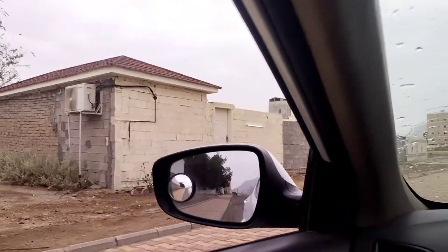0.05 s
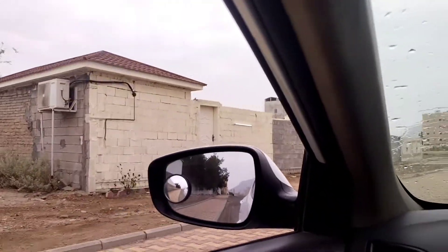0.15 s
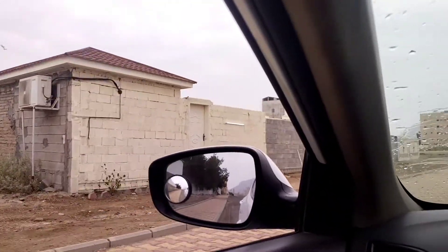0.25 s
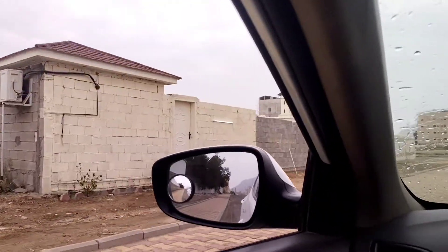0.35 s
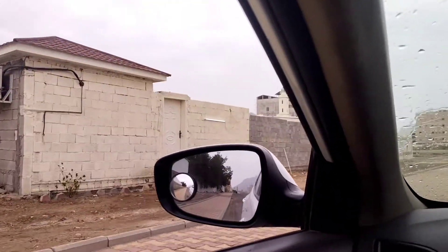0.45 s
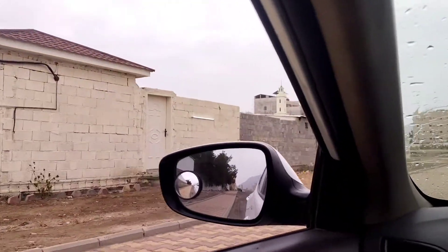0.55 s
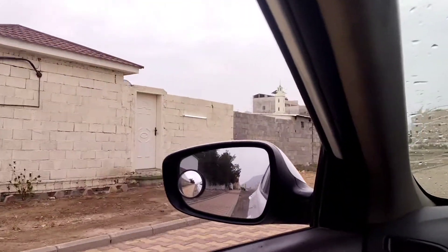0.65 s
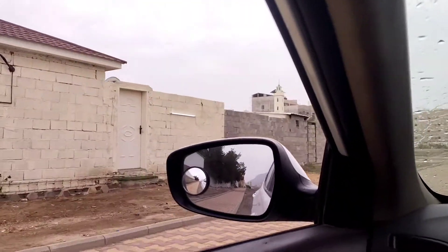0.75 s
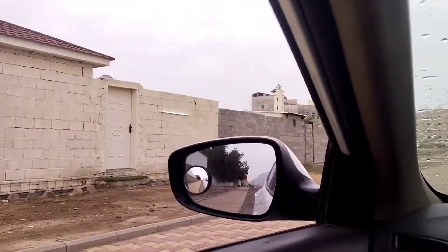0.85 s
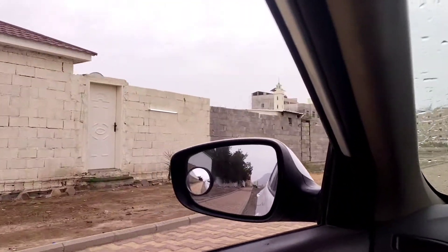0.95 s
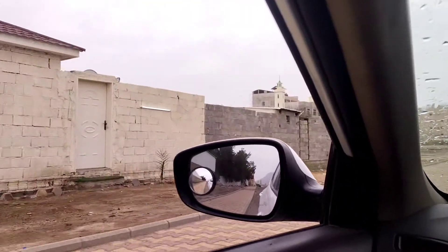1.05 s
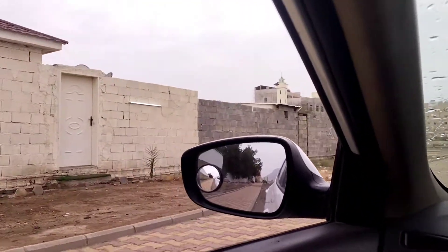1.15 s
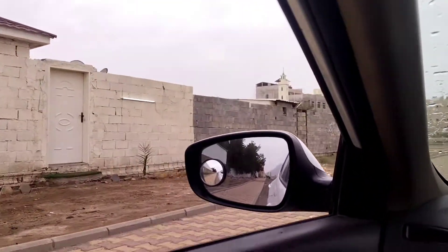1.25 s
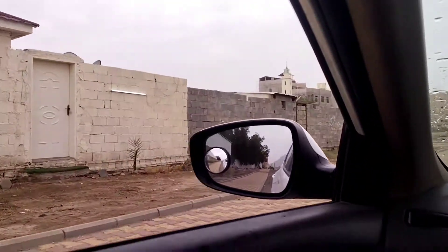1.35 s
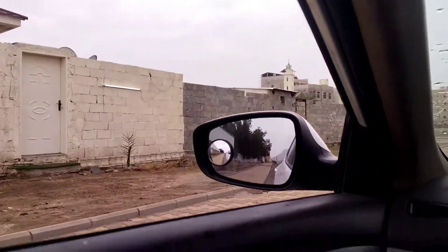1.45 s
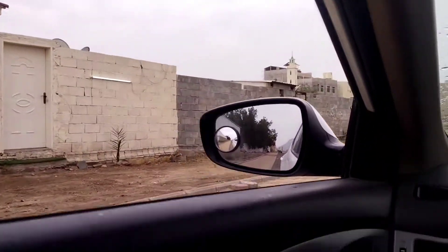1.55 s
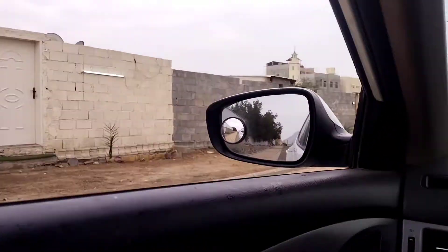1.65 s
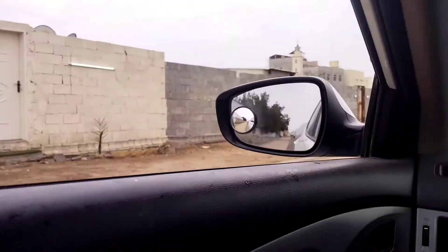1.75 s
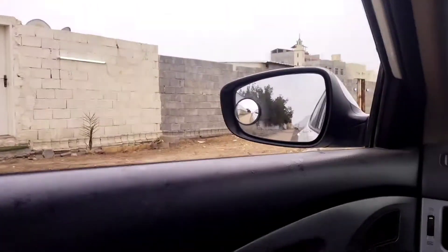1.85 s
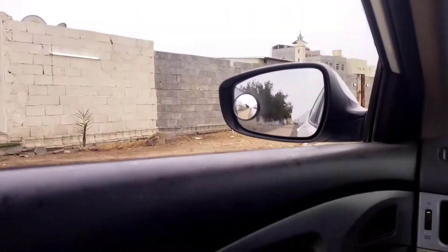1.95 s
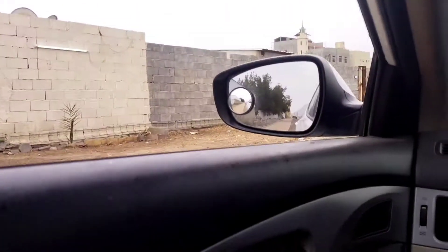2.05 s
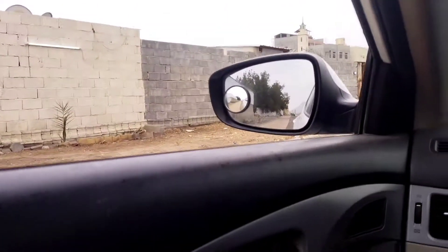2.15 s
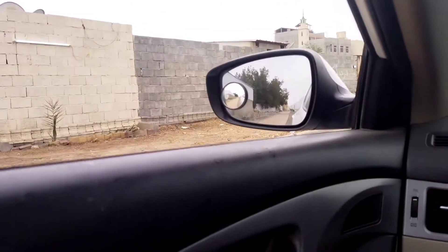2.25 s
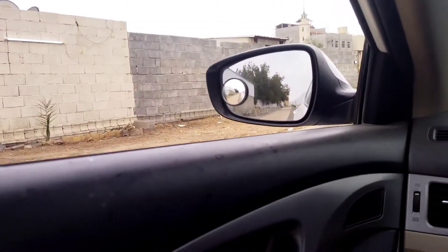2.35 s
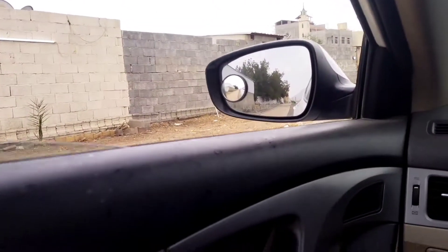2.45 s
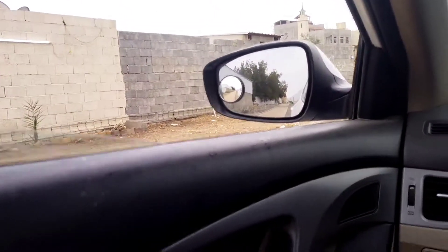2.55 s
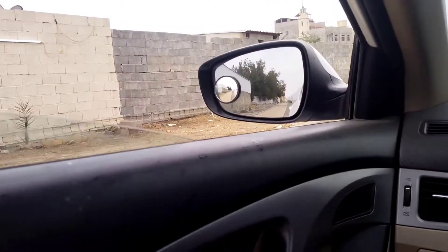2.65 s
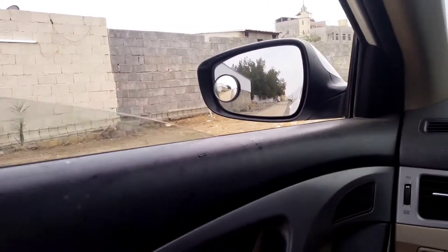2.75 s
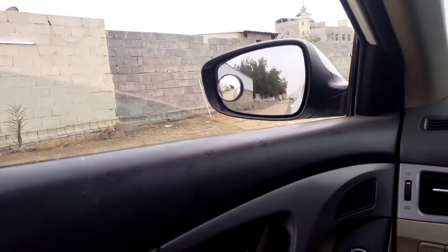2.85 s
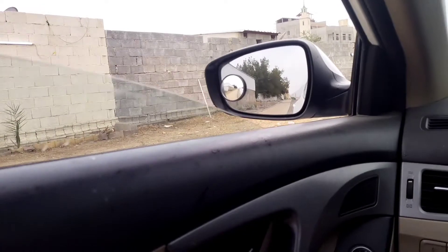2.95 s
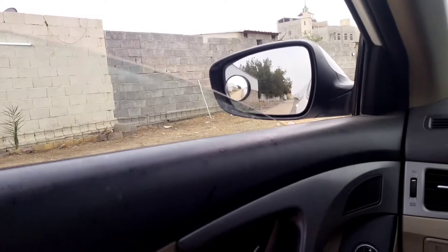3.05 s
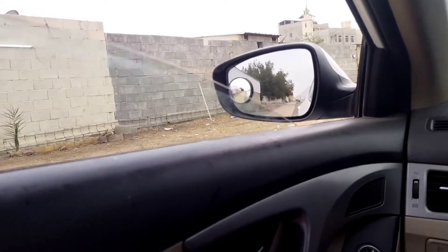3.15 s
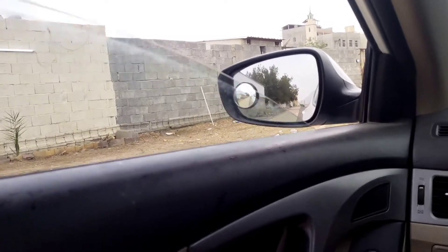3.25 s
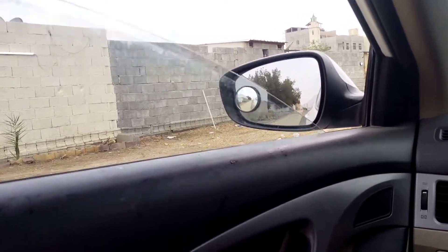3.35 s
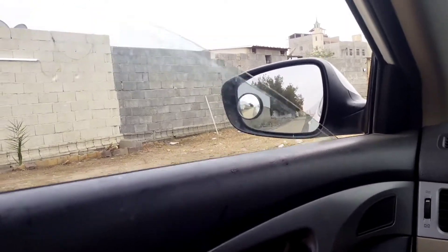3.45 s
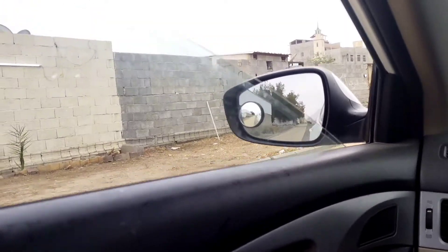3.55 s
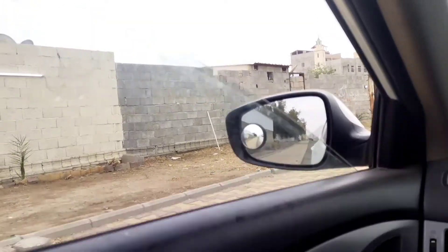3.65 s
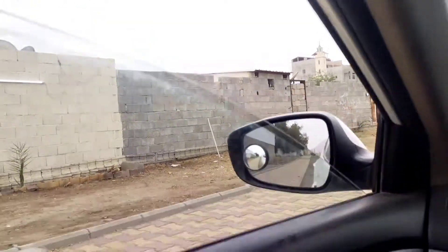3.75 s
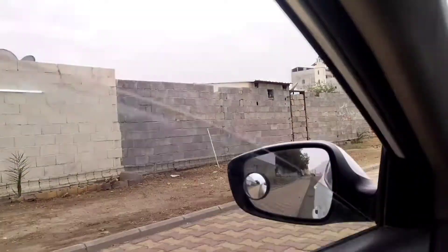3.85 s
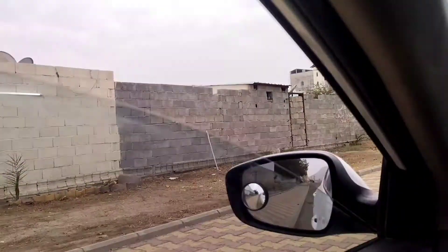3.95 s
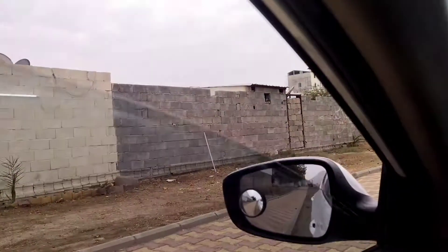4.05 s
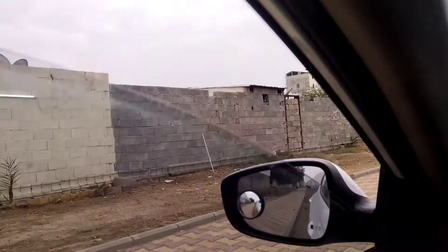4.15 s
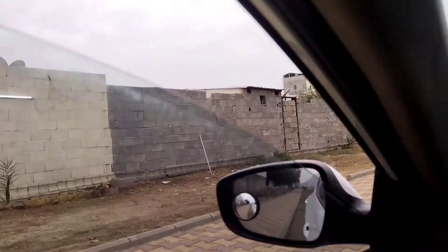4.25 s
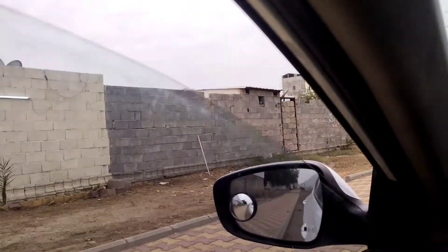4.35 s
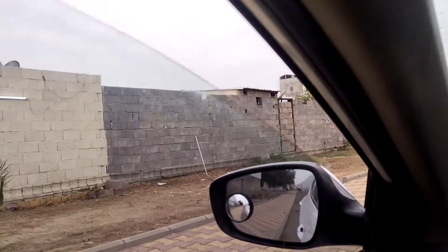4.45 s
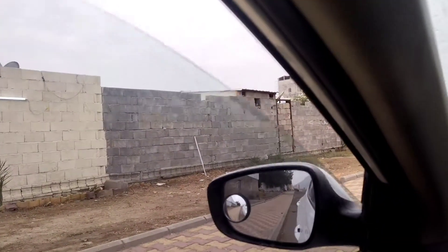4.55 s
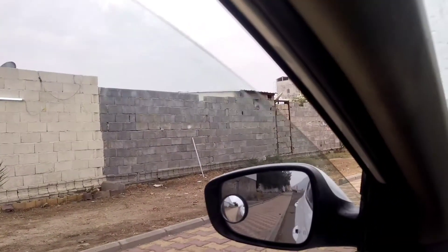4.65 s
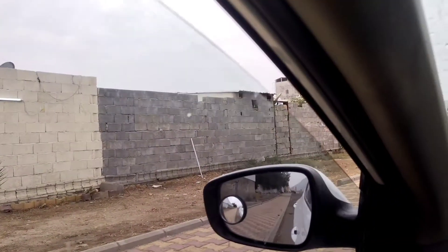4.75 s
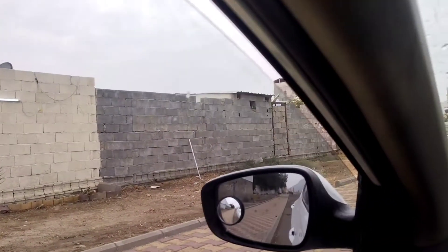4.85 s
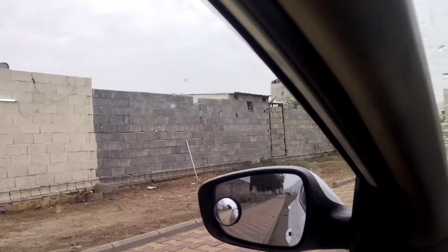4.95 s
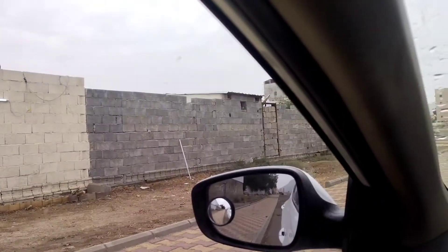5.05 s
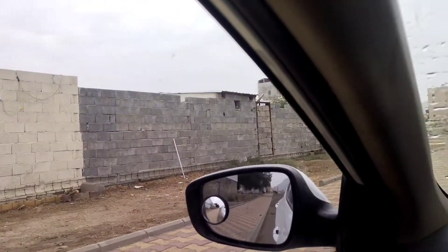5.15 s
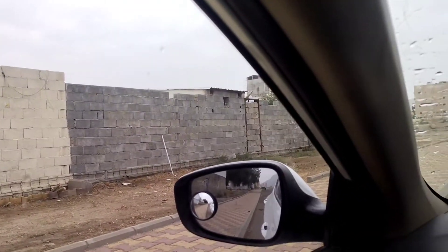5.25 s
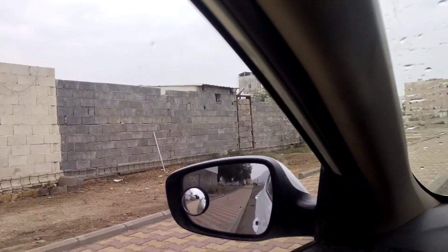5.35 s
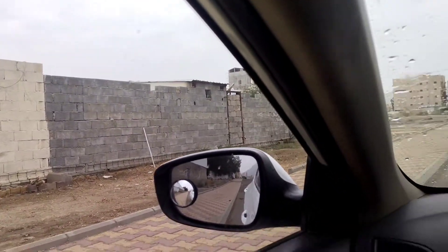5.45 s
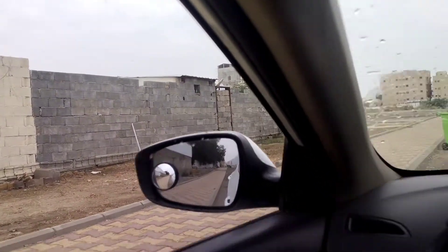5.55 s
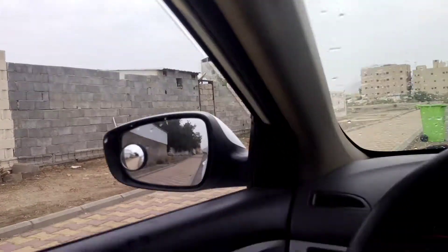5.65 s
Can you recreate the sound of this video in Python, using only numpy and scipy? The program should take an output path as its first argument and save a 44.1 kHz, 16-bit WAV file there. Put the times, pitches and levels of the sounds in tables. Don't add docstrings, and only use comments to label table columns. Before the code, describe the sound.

Inside a small, dry car cabin, a close stereo microphone by the door catches a low bump at the start, then soft tyre rumble fading as the car rolls to a stop, with thin outside air, faint rustles and a tiny tick near 0.5 s. At 2.0 s a plastic switch clicks; around 2.3 s the door mechanism clunks and the window motor spins up, a buzzing mid-pitched whine that sags slightly, while glass hisses along rubber and the idling engine hums beneath. A thin high squeak slips out at 3.5 s. Near 3.9 s a dull thump shakes the door and the whine sinks, straining louder and lowest around 4.2 s, then climbs again. From 5.0 s the glass grinds into the top seal and seats with a solid knock at about 5.15 s. Motor and outside air stop abruptly; after a short hush, a hand knocks and rattles the trim from 5.4 s until the end.

```python
import sys
import numpy as np
from scipy import signal
from scipy.fft import rfft, irfft
from scipy.io import wavfile
from scipy.ndimage import uniform_filter1d

SR = 44100
rng = np.random.default_rng(int(sys.argv[2]) if len(sys.argv) > 2 else 0)


def voltage_ratio(decibels):
    exponent = np.asarray(decibels, float) / 20
    return 10 ** exponent


def dump_mix(stems):
    frames = np.atleast_2d(stems).T
    limited = np.clip(frames, -1, 1)
    pcm = np.round(limited * 32767).astype(np.int16)
    wavfile.write(sys.argv[1], SR, pcm)


N = 250750

SHUT_S = 5.14
LAG = 22
# start_s, motor_colour_0_to_1, high_glass_colour_0_to_1,
# rubbing_colour_0_to_1
STATE = [(0, 0.18, 0.76, 0.01), (2.25, 0.34, 0, 0.27), (2.32, 0.88, 0, 0.77), (3.7, 0.7, 0.23, 0.78),
         (4.2, 0.88, 0.81, 0.6), (5.14, 0.83, 0.48, 1), (5.2, 0.5, 1, 0), (5.55, 0.6, 0.8, 0.04),
         (5.62, 0.6, 0.2, 0.27)]
# start_s, pitch_hz
SPEED = [(2.37, 572), (2.44, 556), (2.56, 550), (2.63, 528), (2.69, 514), (2.78, 504), (2.875, 526),
         (2.91, 512), (3.0, 509), (3.1, 508), (3.18, 524), (3.36, 533), (3.55, 536), (3.66, 543),
         (3.72, 533), (3.78, 516), (3.92, 508), (3.99, 500), (4.04, 472), (4.09, 471), (4.15, 455),
         (4.24, 452), (4.32, 457), (4.41, 474), (4.5, 486), (4.58, 512), (4.66, 533), (4.8, 524),
         (4.98, 520), (5.14, 558)]
# pitch_hz, left_minus_right_db
LEAN = [(60, .5), (250, -.5), (700, 0), (1300, 2.5), (2400, 6.5), (4400, 5.5), (7500, 3.5), (11000, -1)]


def evened(x):
    return x / np.sqrt(np.mean(x ** 2) + 1e-20)


def read(points, hz):
    f, value = np.transpose(points)
    return np.interp(np.log(hz + 1), np.log(f + 1), value)


def columns(rows, t):
    s, *rest = np.transpose(rows)
    return [np.interp(t, s, c) for c in rest]


def add(mix, s, sound):
    part = mix[..., round(s * SR):][..., :sound.shape[-1]]
    part += sound[..., :part.shape[-1]]


def blend(share, first, second):
    share = np.clip(share, 0, 1)
    return (1 - share) * first + share * second


def panned(pan_db):
    lean = voltage_ratio(np.clip(pan_db, -15, 15))
    return np.array([2 * lean / (1 + lean), 2 / (1 + lean)])


def stroke(rows, t):
    inside = (t >= rows[0][0]) * (t <= rows[-1][0])
    return voltage_ratio(columns(rows, t)[0]) * inside


def swells(rows, t):
    return [voltage_ratio(db - np.maximum(abs(rise) * (s - t), abs(fall) * (t - s))) for s, db, rise, fall in rows]


def joined(*gains):
    return np.sqrt(sum(g ** 2 for g in gains))


def noise(shape_db, size, patchy_db, streak_db, flicker_db):
    # pitch_hz, likeness_0_to_1
    likeness = [(60, 0.95), (200, 0.97), (400, 0.69), (800, 0.43), (1300, 0.065), (2500, 0.087),
                (5000, 0.035), (8000, 0.044)]
    hop = size // 4
    t, hz = np.arange(N // hop + 5) * hop / SR, np.fft.rfftfreq(size, 1 / SR)
    a, b, c, d, patch, streak = rng.standard_normal((len(t), len(hz), 6)).T
    patch = evened(uniform_filter1d(uniform_filter1d(patch, size=6, axis=0), size=8, axis=1))
    streak = evened(uniform_filter1d(uniform_filter1d(streak, size=3, axis=0), size=90, axis=1))
    colour = voltage_ratio(shape_db(hz[:, None], t)) * np.ones_like(a)
    colour /= np.sqrt((colour ** 2).mean(0))
    same = np.clip(read(likeness, hz), 0, 1)[:, None]
    lean = voltage_ratio(read(LEAN, hz) / 2)[:, None]
    late = np.exp(-2j * np.pi * hz * LAG / SR * (hz > 1400))[:, None]
    right = a + 1j * b
    left = same * right * late + np.sqrt(1 - same ** 2) * (c + 1j * d)
    texture_db = patchy_db * patch + streak_db * streak + flicker_db * rng.standard_normal(len(t))
    z = np.array([left * lean, right / lean]) * colour * voltage_ratio(texture_db)
    out = signal.istft(z, nperseg=size, noverlap=size - hop)[1][:, :N]
    return out / np.sqrt(np.mean(out.mean(0) ** 2))


def whistle(rows, orders, waver, fade, lag=0, pans=None):
    t = np.arange(rows[0][0], rows[-1][0], 1 / SR)
    hz, *rest = columns(rows, t)
    turns = np.cumsum(hz) / SR - np.outer([lag, 0], hz)
    out = np.zeros((2, N))
    for multiple, column, db in orders:
        tremble = 1 + waver * evened(uniform_filter1d(rng.standard_normal(len(t)), 800))
        level = np.sqrt(2) * voltage_ratio(rest[column] + db) * tremble
        line = level * np.sin(2 * np.pi * (multiple * turns + rng.random()))
        side = panned(rest[column + pans]) if pans else 1
        add(out, t[0], side * line * signal.windows.tukey(len(t), fade))
    return out


def efforts(t):
    # start_s, level_db
    road = [(0, -33.5), (.09, -40.5), (.3, -37.5), (.62, -43.5), (1.1, -40), (1.37, -44.5), (1.74, -44.5),
            (2.27, -48), (2.44, -45), (2.52, -48), (3.8, -56.5), (4.5, -50), (5.0, -55), (5.3, -56),
            (5.686, -40.5)]
    # peak_s, level_db, rise_db_per_s, fall_db_per_s
    jolts = [
        (3.96, -34.5, 128, 117),
        (5.17, -28, 115, 136),
        (5.62, -43, 100, 30),
    ]
    # start_s, level_db
    rub_curve = [(2.26, -64), (2.29, -57), (2.5, -54.5), (3.22, -55), (4.0, -56.5), (4.24, -52), (5.0, -50),
                 (5.128, -44), (5.2, -100)]
    # start_s, level_db
    hands = [
        [(1.98, -85), (2.0, -62), (2.012, -53), (2.06, -53.5), (2.17, -61), (2.26, -56), (2.3, -61)],
        [(5.22, -105), (5.404, -57.5), (5.44, -61.5), (5.46, -65), (5.528, -57), (5.566, -59), (5.626, -45.5),
         (5.686, -49)],
    ]
    # peak_s, level_db, rise_db_per_s, fall_db_per_s
    pushes = [
        (.8, -72.5, 15, 41),
        (3.55, -63.5, 10.5, -2.5),
        (4.6, -58.5, 49, 21),
        (5.2, -54.5, 46, 501),
        (5.3, -85, 11, 10),
        (5.47, -49, 397, 200),
        (5.566, -43.5, 344, 140),
    ]
    start_s = rub_curve[0][0]
    rub, hand = stroke(rub_curve, t), sum(stroke(rows, t) for rows in hands)
    shut_db = -700 * np.maximum(t - SHUT_S, 0)

    def breeze(db, growth_db_per_s):
        return voltage_ratio(db + growth_db_per_s * np.minimum(t, start_s) + shut_db)

    drum = rub * voltage_ratio(-17 + 0.77 * (t - start_s))
    return (joined(stroke(road, t), *swells(jolts, t)),
            joined(breeze(-70.5, -0.98), drum, hand * voltage_ratio(-10.5), *swells(pushes, t)),
            joined(breeze(-66, 2.14), rub, hand),
            joined(breeze(-78.5, 3.27), rub * voltage_ratio(-19.5), hand * voltage_ratio(-28)))


def road_rumble(gain):
    # pitch_hz, level_db
    idle = [(20, -29.5), (43, -15.5), (123, 3.5), (162, -9.5), (198, -8.5), (296, -22), (353, -35),
            (400, -20.5), (520, -29), (880, -120)]
    running = [(25, -30), (52, -29), (72, -21), (90, -7), (130, -4), (175, 2.5), (220, -20), (300, -5.5),
               (420, -38), (880, -120)]

    def shape(hz, t):
        return blend(columns(STATE, t)[0], read(idle, hz), read(running, hz))

    return voltage_ratio(-2.5) * gain * noise(shape, size=2048, patchy_db=2.5, streak_db=1.5, flicker_db=0.36)


def door_drone(gain):
    # pitch_hz, level_db
    idle = [(140, -14.5), (230, -0.5), (355, -15), (390, -7), (451, -17), (599, -10), (1300, -29),
            (1690, -54), (2860, -120)]
    low_glass = [(180, -43.5), (260, -13), (330, -20.5), (430, -4.5), (560, -8.5), (700, -13), (830, -22),
                 (1000, -13.5), (1200, -25.5), (1500, -12), (2200, -65)]
    high_glass = [(180, -27.5), (250, -19.5), (330, 6), (400, 4.5), (520, -8), (660, -33.5), (790, -10),
                  (900, -19), (1100, -19.5), (1400, -38), (2200, -65)]

    def shape(hz, t):
        on, height, _ = columns(STATE, t)
        return blend(on, read(idle, hz), blend(height, read(low_glass, hz), read(high_glass, hz)))

    return voltage_ratio(11.5) * gain * noise(shape, size=1024, patchy_db=2.2, streak_db=2.2, flicker_db=.6)


def seal_hiss(gain):
    # pitch_hz, level_db
    idle = [(530, -27), (900, -2), (1310, 8.5), (1420, 7.5), (2140, 2.5), (2610, 0), (2820, 2.5),
            (3340, 3.5), (3610, -6.5), (4360, 1), (4910, -4.5), (6470, -5), (9500, -21.5), (12400, -25),
            (20900, -120)]
    low_glass = [(760, -26), (1300, -40.5), (1370, -12), (1550, -15), (1700, 10), (1940, -17.5),
                 (2250, -13.5), (2470, 0.5), (2990, -4), (3620, 3.5), (4070, -6), (5810, -6), (6420, -5),
                 (8180, -20), (9500, -15), (12400, -46), (20900, -120)]
    high_glass = [(760, -54), (1300, -28), (1470, -58), (1600, -37), (1800, -14), (1910, -34), (2050, -1),
                  (2290, 5), (2470, -2.5), (4840, -11), (6110, -0.5), (8320, -20), (9500, -14.5),
                  (12400, -59), (20900, -120)]

    def shape(hz, t):
        _, height, rubbing = columns(STATE, t)
        return blend(rubbing, read(idle, hz), blend(height, read(low_glass, hz), read(high_glass, hz)))

    t = np.arange(N) / SR
    hiss = noise(shape, size=1024, patchy_db=2.8, streak_db=2.8, flicker_db=1.2)
    turns = np.cumsum(columns(SPEED, t)[0]) / SR
    sparks = 1 + 0.067 * columns(STATE, t)[0] * np.cos(2 * np.pi * turns)
    return gain * hiss * sparks


def thin_air(gain):
    # pitch_hz, level_db
    air = [(4410, -49), (7500, 1), (8160, -6.5), (8960, -6), (12000, -14), (14900, -19), (15200, -30)]
    return voltage_ratio(2.2) * gain * noise(lambda hz, t: read(air, hz), size=256, patchy_db=-1.0, streak_db=2.0,
                                   flicker_db=-1.0)


def engine():
    # start_s, firing_hz, level_db
    idle = [(0, 31.5, -60), (1, 31.3, -59), (2, 32, -57), (2.9, 32.7, -51), (3.56, 34.4, -50),
            (5.686, 34.4, -50.5)]
    # multiple, level_db
    firing = [(1, -16), (2, -18), (3, -6.5), (4, -4.5), (5, -4.5), (6, -15.5), (8, -12), (9, -12),
              (10, -12.5), (11, -28.5), (12, -21)]
    return whistle(idle, [(k, 0, db) for k, db in firing], waver=0.094, fade=.002)


def thumps():
    # start_s, peak_db, pitch_hz, t60_s
    bumps = [(0.0, -27, 130, 0.1), (0.04, -21, 125, 0.24), (0.244, -34.5, 152.4, 0.15),
             (2.313, -36.5, 177.8, 0.36), (3.925, -27, 173.9, 0.48), (4.063, -27.5, 250, 0.11),
             (5.023, -24, 132, 0.14), (5.085, -24.5, 113.7, 0.28), (5.136, -21.5, 119, 0.29),
             (5.165, -17.5, 120.4, 0.243), (5.55, -29.5, 308, 0.15), (5.588, -26, 224.3, 0.25),
             (3.941, -31.5, 245, 0.14), (4.075, -31.5, 328, 0.11)]
    door_knocks = [(2.0165, -35, 457, 0.093), (2.282, -28, 427, 0.1), (2.311, -22, 454, 0.038),
                   (2.344, -19.5, 263, 0.06), (5.101, -31, 510, 0.035), (5.289, -40, 332, 0.1),
                   (5.323, -37.5, 317, 0.21), (5.467, -29, 302, 0.08), (5.502, -29, 300, 0.04),
                   (5.5115, -22, 270, 0.04), (5.529, -30, 230, 0.05), (5.578, -30, 330, 0.04),
                   (5.556, -19, 281.6, 0.11), (5.612, -19, 242, 0.04), (5.597, -30, 260, 0.051),
                   (5.619, -28, 303, 0.038),
                   (2.0172, -29, 737, 0.063), (2.179, -40.5, 743, 0.13), (2.282, -34, 697, 0.25),
              (2.307, -32.5, 533, 0.18), (2.327, -33.5, 797, 0.13), (2.351, -39, 609, 0.34),
              (5.102, -32, 588, 0.072), (5.1345, -19.5, 547, 0.043), (5.453, -37, 730, 0.057),
              (5.553, -14, 592, 0.032), (5.611, -28.5, 570, 0.057), (5.5525, -20.5, 1153, 0.03),
              (0.529, -52, 1300, 0.05), (0.533, -52, 850, 0.04), (5.391, -35, 1400, 0.04),
              (5.395, -32, 1400, 0.025), (5.391, -38, 2720, 0.04), (5.3955, -30, 2700, 0.02),
              (5.1368, -26, 3650, 0.013), (2.2803, -28, 3400, 0.015), (2.281, -33, 6000, 0.012),
              (5.117, -32, 2400, 0.02), (5.35, -55, 1400, 0.03), (5.5005, -34, 4950, 0.02),
              (5.547, -33, 700, 0.03), (5.652, -36, 590, 0.15), (5.402, -38, 620, 0.05),
              (5.499, -36, 1150, 0.04), (2.296, -33, 640, 0.06), (5.35, -52, 2720, 0.019)]
    t, out = np.arange(20000) / SR, np.zeros(N)
    for s, peak_db, hz, t60 in bumps + door_knocks:
        modes = np.sin(2 * np.pi * hz * t)
        modes += 0.25 * np.sin(2 * np.pi * 1.35 * hz * t)
        modes += 0.33 * np.sin(2 * np.pi * 0.88 * hz * t)
        attack = 1 - np.exp(-t * hz / 0.92)
        add(out, s, voltage_ratio(peak_db - 60 * t / t60) * modes * attack)
    return out * panned(np.array([-.8]))


def scuffs():
    # peak_s, level_db, rise_db_per_s, fall_db_per_s,
    # centre_hz
    rubs = [(.33, -67, 300, 196, 1390), (.48, -58.5, 200, 300, 1230), (0.599, -64.5, 200, 64, 3360),
            (.9, -63, 400, 300, 2000), (1.05, -50, 204, 300, 297), (1.11, -58, 248, 250, 2700),
            (1.115, -60, 200, 200, 5030), (1.2, -55, 198, 150, 770), (1.36, -64.5, 200, 200, 6500),
            (1.5, -67, 402, 100, 2500), (1.52, -60, 200, 200, 790), (1.75, -56, 250, 152, 605),
            (1.75, -68, 100, 100, 6760), (1.94, -65, 300, 300, 696), (3.45, -54, 58, 40, 716),
            (5.16, -70, 900, 170, 2100), (5.17, -69, 900, 247, 3840), (5.33, -72, 150, 300, 3200),
            (0.681, -51.5, 300, 200, 298), (0.819, -54, 200, 300, 380), (0.419, -61, 150, 150, 1090),
            (.76, -64, 100, 152, 3300), (1.85, -66, 98, 60, 1630), (5.525, -44, 400, 400, 218),
            (3.33, -48, 150, 69, 680), (3.62, -50, 80, 100, 650), (.536, -52, 1500, 1200, 3520),
            (5.2, -67.5, 300, 152, 2200), (5.03, -44, 300, 200, 198), (5.15, -47, 900, 300, 1100),
            (3.9, -48, 101, 102, 396),
            (5.38, -71, 401.5, 602, 5500), (5.399, -57, 600, 300, 11000), (5.386, -68, 350, 900, 3500),
                 (5.474, -51, 900, 700, 2220), (5.548, -41.5, 1500, 900, 2580),
                 (5.592, -43, 1200, 300, 2510), (5.615, -42.5, 900, 400, 3370),
                 (5.612, -46.5, 900, 400, 5770), (5.668, -42.5, 500, 395, 3270),
                 (5.67, -46, 300, 200, 6030), (5.125, -47, 600, 900, 4800), (5.15, -55, 900, 500, 4300),
                 (5.52, -56, 500, 200, 3200), (.535, -58, 1500, 1500, 6500)]
    slips_per_s, width = 1800, 0.41
    t, out = np.arange(-.5, .5, 1 / SR), np.zeros((2, N + SR))
    for s, db, rise, fall, hz in rubs:
        slips = voltage_ratio(3.3 * np.minimum(rng.exponential(1, len(t)), 3)) * (rng.random(len(t)) < slips_per_s / SR)
        common, own = rng.standard_normal((2, len(t))) * slips
        b, a = signal.iirpeak(hz, 1 / width, SR)
        ports = [np.roll(common, LAG) + 1.4 * own, common]
        rung = signal.lfilter(b, a, signal.lfilter(b, a, ports))
        swell = swells([(0, db, rise, fall)], t)[0]
        add(out, s, evened(rung) * swell * panned(read(LEAN, np.array([hz]))))
    return out[:, SR // 2:][:, :N]


def ticks():
    # start_s, peak_db, t60_s, left_minus_right_db, treble_slope_db_per_octave
    bright = [
        (0.532, -42, 0.04, 12, 0),
        (2.0168, -20, 0.019, 8, 1.5),
        (2.178, -35.5, 0.042, 6, -1.0),
        (2.28, -23, 0.032, 8.5, 5),
        (5.1033, -19.5, 0.02, 5, -2.5),
        (5.119, -28, 0.075, -8, -5.5),
        (5.135, -18.5, 0.024, 2, -1.5),
        (5.1378, -21, 0.014, 10, -3),
        (5.39, -31, 0.094, 10, -3),
    ]
    dull = [
        (2.0227, -22.5, 0.027, 3.8, -6),
        (2.2867, -32.5, 0.2, 1, -6),
        (5.3959, -25, 0.036, 3.7, -0.5),
        (5.452, -30, 0.058, 5, -6),
        (5.473, -31, 0.028, 4.5, -18),
        (5.5005, -25, 0.022, 8, 4),
        (5.5475, -28, 0.033, 13, -19),
        (5.606, -24.5, 0.067, 0.5, -4),
    ]
    # pitch_hz, level_db
    plastic = [(590, -2.5), (1000, 0.5), (1910, -4.5), (2930, -3.5), (5170, -5.5), (5920, -3),
               (8320, -17.5), (15000, -33)]
    t, hz_axis, out = np.arange(8192) / SR, np.fft.rfftfreq(8192, 1 / SR), np.zeros((2, N))
    for ring_hz, (s, tick_db, t60, pan_db, slope_db) in [(3000, r) for r in bright] + [(1293, r) for r in dull]:
        common, own = rng.standard_normal(len(t)), rng.standard_normal((2, len(t)))
        colour = voltage_ratio(read(plastic, hz_axis) + slope_db * np.log2(1 + hz_axis / 2500))
        ports = np.array([np.roll(common, LAG), common]) + 0.9 * own
        grit = irfft(rfft(ports) * colour)
        ring = signal.lfilter(*signal.iirpeak(ring_hz, 12, SR), grit)
        decay = voltage_ratio(-60 * t / t60) + 0.06 * voltage_ratio(-60 * t / 0.18)
        attack = 1 - np.exp(-t / (0.013 * t60))
        crack = (evened(grit) + 0.9 * evened(ring)) * decay * attack
        add(out, s, voltage_ratio(tick_db - 7.5) * crack * panned(np.array([pan_db])))
    return out


def singing_panel():
    # start_s, pitch_hz, level_db
    panel = [(2.29, 283, -44.5), (2.354, 264.5, -37.5), (2.53, 274, -50), (2.636, 261, -44),
             (2.72, 265, -70)]
    return whistle(panel, [(1, 0, 0)], waver=0.25, fade=0.1)


def motor():
    # start_s, first_multiple_db, second_multiple_db
    load = [(2.37, -43, -67), (2.4, -37, -62), (2.47, -46, -57.5), (2.57, -48.5, -49.5), (2.63, -41, -62.5),
            (2.69, -41, -57), (2.73, -37.5, -64), (2.78, -36.5, -56.5), (2.88, -39.5, -57),
            (2.99, -37, -65), (3.04, -34, -56), (3.08, -36, -66), (3.18, -41.5, -51), (3.4, -40, -51),
            (3.61, -43, -50), (3.71, -41.5, -48.5), (3.77, -41, -59), (3.92, -40, -50), (3.95, -43, -56),
            (4.04, -38, -53), (4.14, -34, -54), (4.3, -34, -55.5), (4.42, -34.5, -48.5), (4.51, -40, -55),
            (4.54, -41, -70), (4.56, -38.5, -56), (4.585, -42, -50), (4.66, -43, -55), (4.8, -43, -51),
            (4.99, -45, -48), (5.03, -41, -50), (5.07, -54, -51.5), (5.14, -53, -48)]
    weak_orders = [(5, -29)]
    # commutator_hz, first_left_minus_right_db, second_left_minus_right_db
    door = [(450, -4, 0), (466, -1, 4), (489, -7, -7), (502, 3, 8), (520, 2.5, 13), (533, -3.5, 7),
            (550, -4, -14), (580, 8, 0)]
    t = np.arange(load[0][0], load[-1][0], .005)
    hz = uniform_filter1d(columns(SPEED, t)[0], size=4)
    rows = np.transpose([t, hz, *columns(load, t), *columns(door, hz)])
    orders = [(1, 0, 0), (2, 1, 0.0035)] + [(k, 1, db) for k, db in weak_orders]
    return whistle(rows, orders, waver=0.2, fade=0.016, lag=.00008, pans=2)


def squeaks():
    # start_s, pitch_hz, level_db
    slips = [
        [(3.497, 8920, -77), (3.512, 8970, -37.5), (3.527, 8916, -29.5), (3.548, 8914, -44.5),
         (3.57, 8912, -70)],
        [(5.615, 10240, -84), (5.632, 10370, -34.5), (5.65, 10390, -60)],
    ]
    lines = sum(whistle(rows, [(1, 0, 0.0022)], waver=0.059, fade=.2, lag=.00002) for rows in slips)
    return lines * panned(np.array([-6.]))


def thin_lines():
    # start_s, pitch_hz, level_db
    songs = [
        [(3.68, 2800, -80), (3.75, 2800, -66), (3.87, 2790, -65), (3.97, 2800, -80)],
        [(4.0, 3400, -80), (4.06, 3290, -65), (4.15, 3190, -64), (4.3, 3170, -65), (4.36, 3200, -80)],
    ]
    return sum(whistle(rows, [(1, 0, 0)], waver=.5, fade=.1) for rows in songs) * panned(np.array([6.]))


def seal():
    # start_s, level_db, centre_hz
    grind = [(5.02, -72, 3875), (5.055, -44.5, 3760), (5.09, -42, 3000), (5.11, -42, 2550),
             (5.135, -40, 3000), (5.15, -76, 2805), (5.18, -80, 2800)]
    slips_per_s, width_hz = 2500, 900
    t, out = np.arange(grind[0][0], grind[-1][0], 1 / SR), np.zeros((2, N))
    level_db, hz = columns(grind, t)
    force = voltage_ratio(2.6 * np.minimum(rng.exponential(1, len(t)), 2))
    slips = rng.standard_normal((2, len(t))) * force * (rng.random(len(t)) < slips_per_s / SR)
    turn, r = np.exp(2j * np.pi * np.cumsum(hz) / SR), np.exp(-np.pi * width_hz / SR)
    rubber = (turn * signal.lfilter([1], [1, -2 * r, r * r], slips / turn)).real
    add(out, t[0], voltage_ratio(level_db) * evened(rubber) * panned(np.array([5.5])))
    return out


def scene():
    road, door, seals, thin = efforts(np.arange(N) / SR)
    cabin = road_rumble(road) + door_drone(door) + seal_hiss(seals) + thin_air(thin)
    window = singing_panel() + motor() + squeaks() + thin_lines() + seal()
    return cabin + engine() + thumps() + scuffs() + ticks() + window


def gated(x):
    hz, t, z = signal.stft(x, SR, nperseg=2048, noverlap=1536)
    power = (abs(z) ** 2).mean(0)
    power = uniform_filter1d(uniform_filter1d(power, size=4, axis=0), size=4, axis=1) + 1e-20
    whining = t > 2.4
    under = power / power[hz > 400].max(0) ** .6 * whining + ~whining
    band = (hz > 1150) & (hz < 2250)
    weakest = under < np.percentile(under[band], 5)
    weak = band[:, None] & weakest & (t < SHUT_S)
    return signal.istft(z * voltage_ratio(-14 * weak), SR, nperseg=2048, noverlap=1536)[1][:, :N]


def top_cut(x):
    return signal.sosfilt(signal.butter(12, 15480, fs=SR, output="sos"), x)


def record(dry):
    self_noise = signal.lfilter([1], [1, -.7], rng.standard_normal(dry.shape)) * voltage_ratio(-81)
    bass_cut = signal.butter(N=2, Wn=48, btype="high", fs=SR, output="sos")
    heard = signal.sosfilt(bass_cut, dry + self_noise)
    treble_cut = signal.firwin(511, 15130, window=("kaiser", 8), fs=SR)
    heard = signal.oaconvolve(heard, treble_cut[None], "same")
    return top_cut(gated(heard))


dry = scene()
out = record(dry)
dump_mix(out)
```